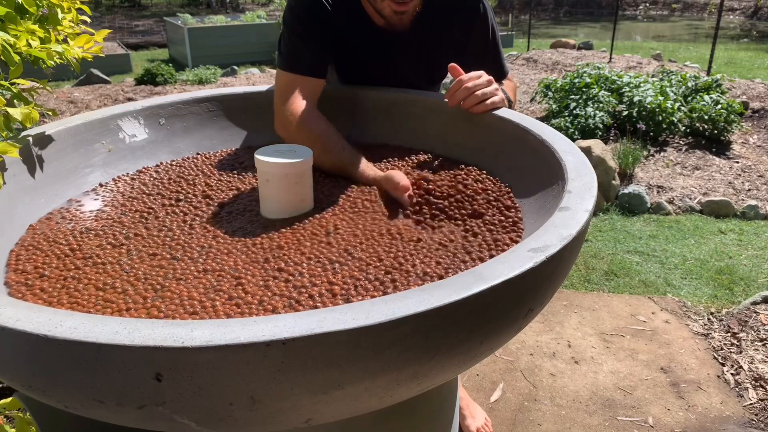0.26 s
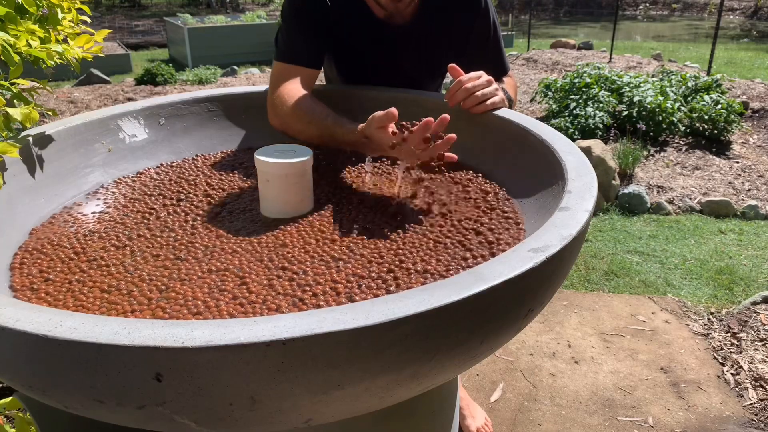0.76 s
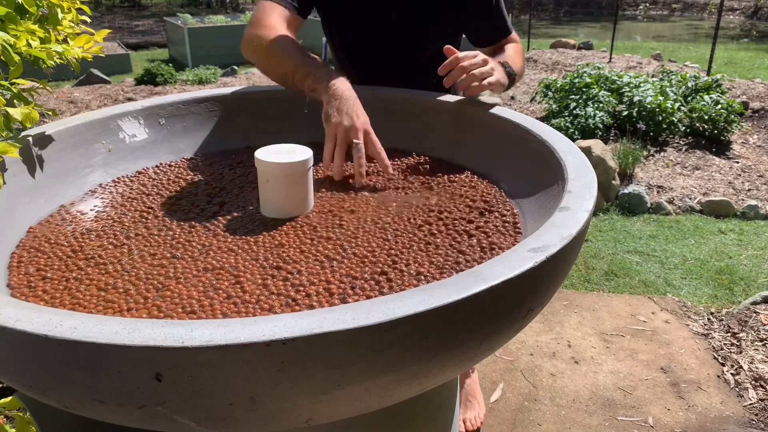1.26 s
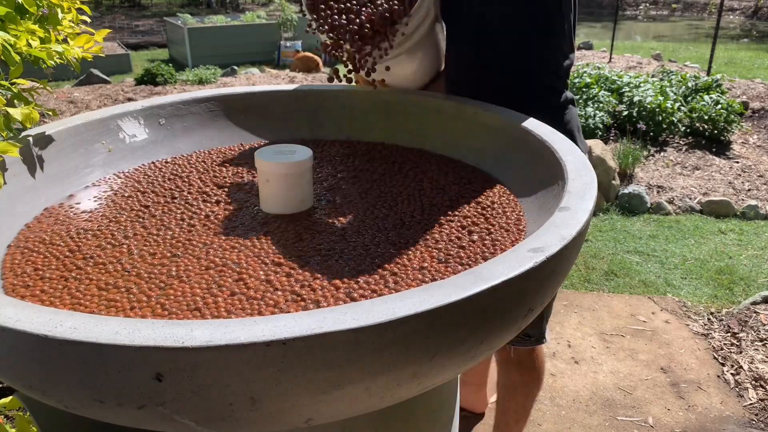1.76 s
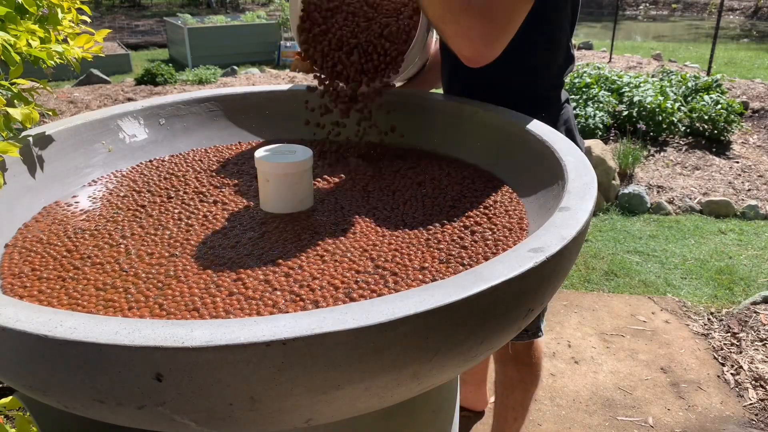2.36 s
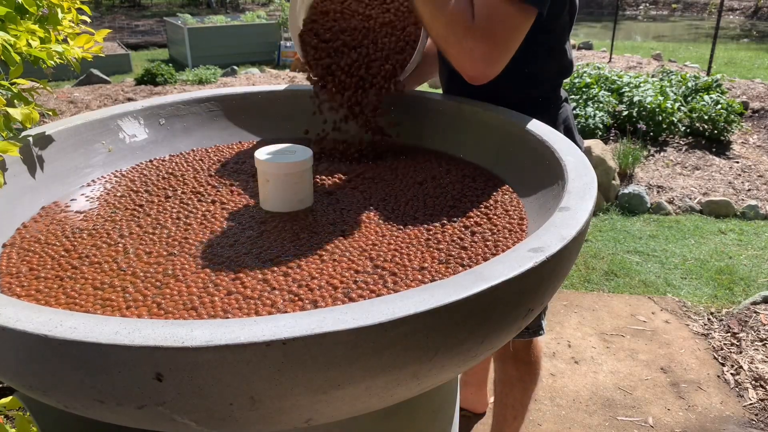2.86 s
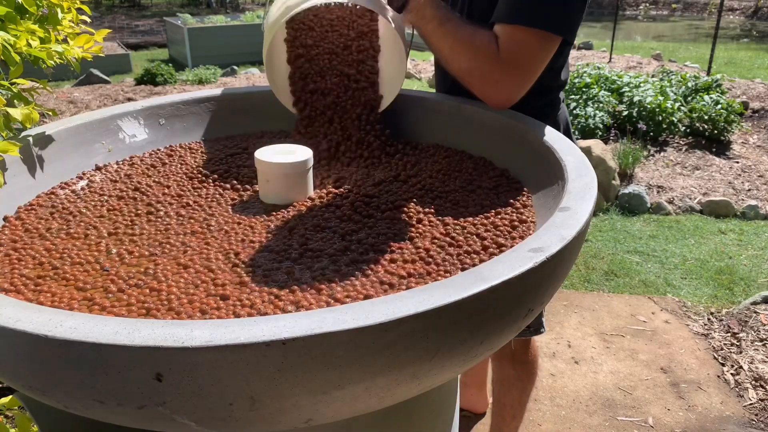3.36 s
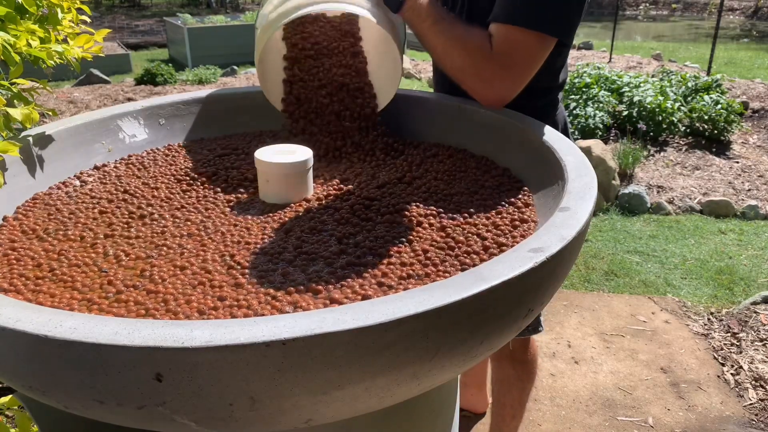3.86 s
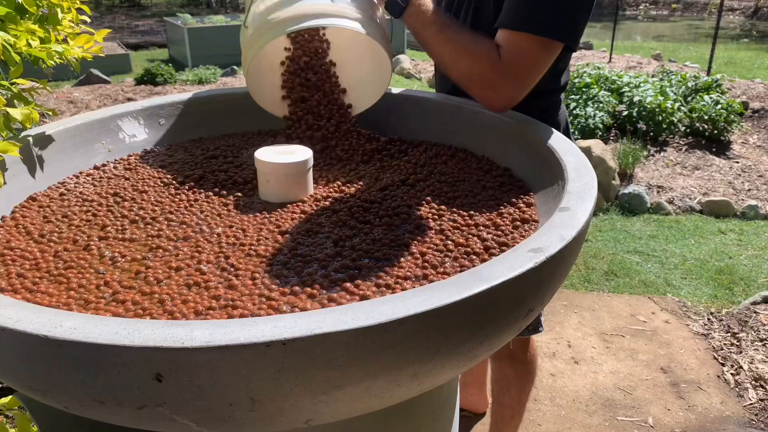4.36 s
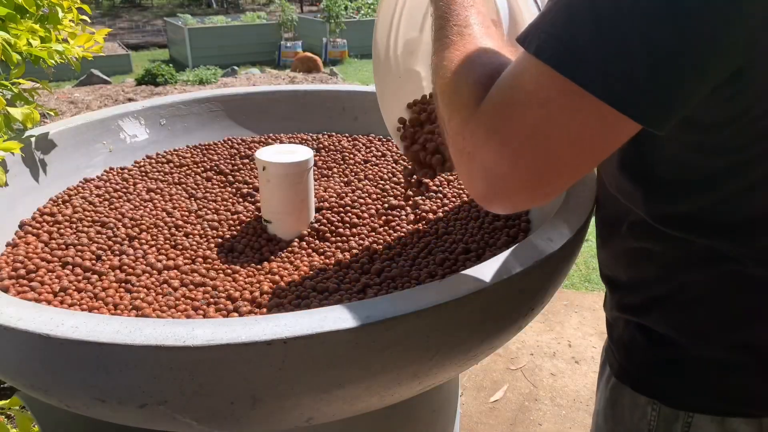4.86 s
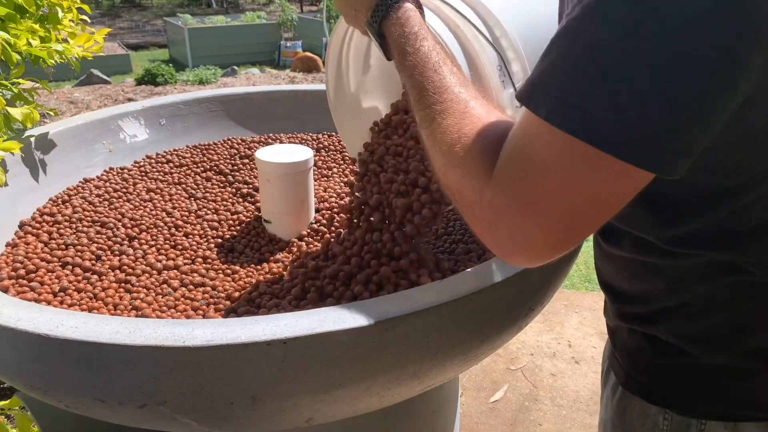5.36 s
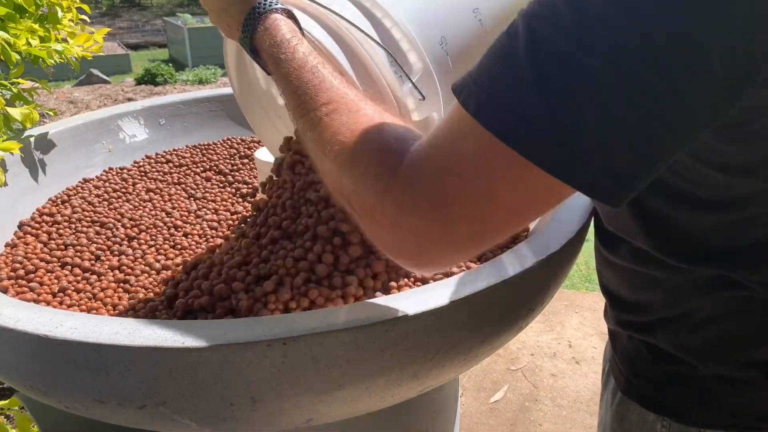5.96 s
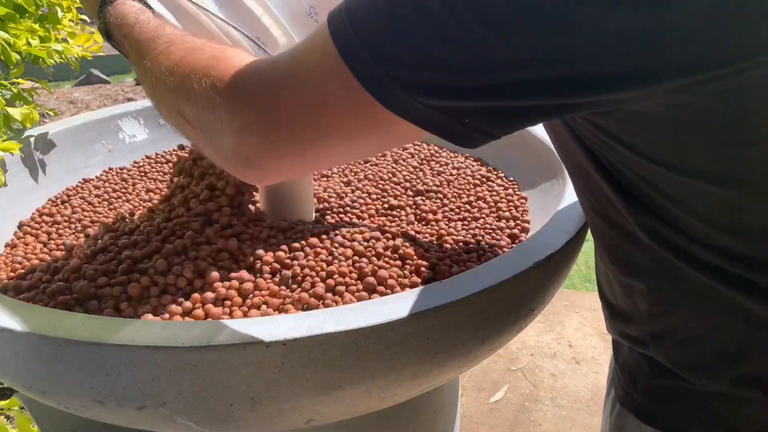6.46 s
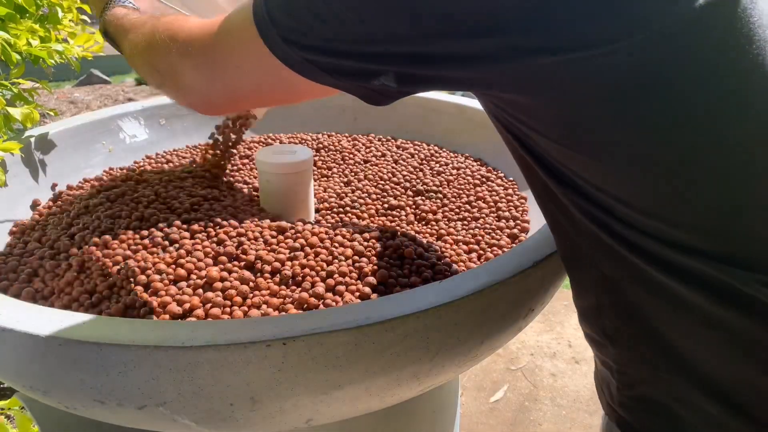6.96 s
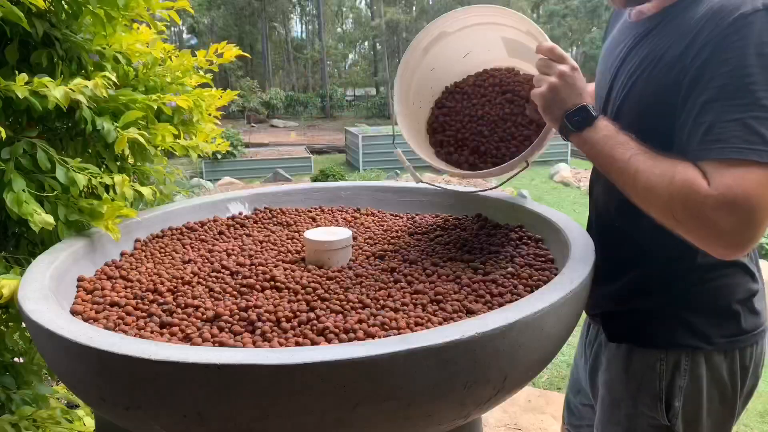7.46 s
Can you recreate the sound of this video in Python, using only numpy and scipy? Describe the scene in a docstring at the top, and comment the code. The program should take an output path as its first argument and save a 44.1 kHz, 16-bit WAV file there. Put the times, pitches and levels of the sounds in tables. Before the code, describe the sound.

A hand stirs wet clay pebbles in a water-filled bowl with trickles and drips, then buckets of pebbles pour in, clattering loudly in several bursts.

```python
"""Pebbles clatter, clack and plop in water: a hand stirs and drops them, then a bucket pours them four times.
Porous clay pebbles, a wide water-filled bowl outdoors; five passages, each fading in and out, some far, some near.
Thousands of short damped contacts make the clatter; single clacks are bursts of contacts in one broad resonance.
Bubbles, trickle and plops are decaying or swelling sines; filtered noise is the open air.
The recorder cuts the bass in steps, squashes the peaks and keeps hardly anything above about 7 kHz."""
import sys
import numpy as np
from scipy import signal
from scipy.fft import rfft, irfft, next_fast_len
from scipy.io import wavfile
from scipy.ndimage import uniform_filter1d, map_coordinates

SR = 44100
rng = np.random.default_rng(int(sys.argv[2]) if len(sys.argv) > 2 else 0)


def natural_amplitude(level_db):
    """Convert a level in decibels to a linear amplitude factor, elementwise."""
    exponent = np.asarray(level_db, float) / 20
    return 10 ** exponent


def materialize(psi):
    """Save the field psi as 16-bit PCM at rate SR to the path in sys.argv[1].

    A 1-D psi becomes a single channel; in a 2-D psi each row is a channel.
    """
    bounded = np.clip(np.atleast_2d(psi).T, -1, 1)
    quanta = np.round(bounded * 32767).astype(np.int16)
    wavfile.write(sys.argv[1], SR, quanta)


N = 340452  # samples
SPLIT_HZ, TOP_HZ = 4050, 7250  # between dull body and hard ticks; upper limit of the sound


def unit(x):
    """Scale to rms 1."""
    return x / np.sqrt(np.mean(x ** 2) + 1e-20)


def along(points, hz):
    """Interpolate (pitch_hz, value) points on a log frequency axis."""
    f, v = np.transpose(points)
    return np.interp(np.log(hz + 1), np.log(f + 1), v)


def wobble(rate):
    """A smooth random curve with rate knots a second."""
    knots = rng.standard_normal(int(N * rate / SR) + 4)
    return map_coordinates(knots, [np.arange(N) * rate / SR])


def filtered(x, response):
    """Filter x by a response given as a function of frequency."""
    m = next_fast_len(len(x) + 8192)
    return irfft(rfft(x, m) * response(np.fft.rfftfreq(m, 1 / SR)), m)[:len(x)]


def resonance(f, centre_hz, width_hz):
    """Response of one damped mode, 1 at its centre."""
    damping = 1j * f * width_hz
    return damping / (centre_hz * centre_hz - f * f + damping)


def roughness(n, size):
    """Slow random unevenness of rms 1."""
    return unit(uniform_filter1d(rng.standard_normal(n), size=size))


def contacts(n, rate, spread_db, cycles):
    """Random pebble contacts: each a click and a damped ring of a few cycles, evened to a flat spectrum."""
    draw = rng.random((int(rate * n / SR), 3))
    hz = 300 * 25 ** draw[:, 1:2]
    sign = np.sign(draw[:, 2:] - .5)
    size = sign * natural_amplitude(2 * spread_db * np.tanh(rng.standard_normal((len(draw), 1)) / 2))
    t = np.arange(400) / SR
    ring = np.sin(2 * np.pi * hz * t) * np.exp(-t * hz / cycles) * hz / 3000
    ring[:, 0] += 1.5  # the click
    at = (draw[:, :1] * n).astype(int) + np.arange(len(t))
    z = rfft(np.bincount(at.ravel(), (size * ring).ravel())[:n])
    smooth_power = uniform_filter1d(abs(z) ** 2, size=n // 100)
    return unit(irfft(z / np.sqrt(smooth_power + 1e-9), n))


# changes from one passage to the next: time_s, fade_out_s, fade_in_s
CUTS = [(1.492, 0.21, 0.22), (3.01, 0.11, 0.13), (4.355, 0.12, 0.15), (7.33, 0.16, 0.17)]


def swells(rows):
    """Each flow of pebbles rises, holds while drifting, then dies; none outlasts its passage."""
    rise_curve, release_db_per_s = 1.75, 145
    t, power = np.arange(N) / SR, np.zeros(N)
    ends = np.array([c[0] for c in CUTS] + [N / SR])
    for start, rise, hold, db, drift in rows:
        age = t - start - rise
        level_db = db + drift * np.clip(age, 0, hold) - release_db_per_s * np.clip(age - hold, 0, None)
        alive = t < ends[np.searchsorted(ends, start + rise)]
        onset = np.clip((t - start) / rise, 0, 1) ** rise_curve
        power += (natural_amplitude(level_db) * onset * alive) ** 2
    return np.sqrt(power)


# colour of the distant outdoor hiss: pitch_hz, relative level_db
GARDEN = [(150, -18.5), (773, -7), (7000, -4)]


def garden():
    """A faint steady hiss of the open air: filtered noise."""
    noise = rng.standard_normal(N)
    return natural_amplitude(-57.0) * unit(filtered(noise, lambda hz: natural_amplitude(along(GARDEN, hz)) * (hz < TOP_HZ)))


# bubbles and drips in the bowl: start_s, level_db, pitch_hz, t60_s
BUBBLES = [(.058, -20.5, 3200, 0.031), (.34, -23.5, 716, 0.032), (.785, -28, 885, 0.015),
           (1.004, -27.5, 763, 0.054), (1.025, -34, 1486, 0.082), (1.174, -34.5, 797, 0.095),
           (1.243, -42, 1240, 0.079), (1.246, -40, 1975, 0.098), (1.262, -36, 1440, 0.03),
           (.94, -40, 1240, 0.076)]


def bubbles():
    """A trapped bubble starts softly and rises in pitch as it nears the surface, its level wavering."""
    out, t = np.zeros(N), np.arange(SR // 6) / SR
    for start, db, hz, t60 in BUBBLES:
        tone = np.sin(2 * np.pi * hz * (t + 0.13 * t * t / t60))
        tone *= 1 + 0.53 * roughness(len(t), size=90)
        envelope = natural_amplitude(db - 60 * t / t60) * (1 - np.exp(-t / 0.0031))
        out[round(start * SR):][:len(t)] += envelope * tone
    return out


def bubbling(count, pitch_hz, spread, cycles):
    """Small bubbles scattered around a moving pitch while the hand is in the water; rms 1 where they sound."""
    at = rng.uniform(0.2, 1.27, size=(count, 1))
    scatter, size = rng.standard_normal((2, count, 1))
    hz, t = pitch_hz(at) * np.exp(spread * scatter), np.arange(900) / SR
    envelope = np.exp(-t * hz / cycles) * (1 - np.exp(-t / 0.00085))
    ring = natural_amplitude(4.9 * size) * np.sin(2 * np.pi * hz * t) * envelope
    index = (at * SR).astype(int) + np.arange(len(t))
    x = np.bincount(index.ravel(), ring.ravel(), minlength=N)
    return x / np.sqrt(np.mean(x[x != 0] ** 2))


# gushes of water running off the hand: peak time_s, bubble pitch_hz, top level_db
GUSHES = [(.28, 2460, -45), (0.451, 2820, -21), (.68, 2480, -32.5), (.76, 2580, -39), (.83, 3100, -36),
          (.9, 2500, -40), (.97, 2440, -38.5), (1.028, 2800, -29.5), (1.1, 2530, -34)]


def trickle():
    """Many small bubbles of nearly one size, drifting in pitch from gush to gush, and some larger ones."""
    slope_db_per_s = 261  # how fast a gush swells and thins
    s, pitch_hz, db = np.transpose(GUSHES)
    distance_s = abs(np.arange(N)[:, None] / SR - s)
    flow = np.linalg.norm(natural_amplitude(db - slope_db_per_s * distance_s), axis=1)
    fine = bubbling(count=1600, pitch_hz=lambda at: np.interp(at, s, pitch_hz), spread=.07, cycles=7.6)
    large = bubbling(count=160, pitch_hz=lambda at: 1135, spread=0.363, cycles=4.5)
    return flow * (fine + natural_amplitude(-23.5) * large)


# single pebbles plunging: centre time_s, level_db, pitch_hz
PLOPS = [(3.366, -20.5, 1440), (3.38, -15, 1530), (3.3945, -17.5, 1390), (3.488, -17.5, 1460),
         (3.502, -16, 1870), (3.546, -25.5, 870), (3.55, -18.5, 1520), (3.554, -19, 2600),
         (3.563, -19, 1660), (3.597, -17.5, 1520), (3.657, -19.5, 1460), (3.676, -17.5, 1510),
         (3.868, -18, 2230), (3.965, -16, 2390), (4.184, -19.5, 2720)]


def plops():
    """The pocket of air behind a sinking pebble swells and closes within a few cycles: a short round plop."""
    cycles = 5.8  # from the middle to the fading edge
    out, t = np.zeros(N), np.arange(-SR // 50, SR // 50) / SR
    for s, db, hz in PLOPS:
        rough = 1 + 0.48 * roughness(len(t), size=40)
        envelope = natural_amplitude(db) * np.exp(-(t * hz / cycles) ** 2)
        out[round((s + t[0]) * SR):][:len(t)] += envelope * rough * np.sin(2 * np.pi * hz * t)
    return out


# the half-empty bucket is tipped further: start_s, rise_s, hold_s, top level_db, drift_db_per_s
HOLLOW = [(5.85, 0.39, 0.28, -22, -8.5)]
# the bucket's hollow ring: pitch_hz, width_hz, relative level_db
BUCKET = [(1003, 110, 4)]


def bucket():
    """Pebbles rattling along the plastic wall set its hollow ringing: contacts through the wall mode twice."""
    ring = lambda f: sum(natural_amplitude(db) * resonance(f, hz, width) for hz, width, db in BUCKET)
    rattle = contacts(N, 2800, spread_db=4.5, cycles=3.5)
    return swells(HOLLOW) * unit(filtered(filtered(rattle, ring), ring))


# single clacks and small clusters landing: start_s, level_db, pitch_hz, length_s
CLACKS = [(0.449, -23.5, 3030, 0.002), (0.487, -21.5, 2980, 0.003), (0.81, -34.5, 3240, 0.015),
          (0.844, -31.5, 3000, 0.017), (0.905, -34, 2740, 0.041), (0.96, -30.5, 2420, 0.0074),
          (1.004, -28, 2680, 0.011), (1.025, -24.5, 3100, 0.0085), (1.11, -32, 3040, 0.017),
          (1.158, -33, 2830, 0.028), (1.174, -33, 2660, 0.009), (1.265, -39, 5750, 0.011),
          (1.615, -8.5, 2070, 0.0015), (1.638, -11, 1480, 0.014), (1.66, -0.5, 1470, 0.0017),
          (1.918, -23, 6400, 0.03), (3.893, -17.5, 1520, 0.065), (3.916, -28, 2870, 0.012),
          (3.969, -18, 1670, 0.041), (4.024, -21.5, 1650, 0.03), (4.083, -18.5, 1520, 0.014),
          (4.162, -22, 1500, 0.049), (4.501, -12.5, 2060, 0.0041), (4.583, -12, 1300, 0.003),
          (4.606, -13.5, 1450, 0.008), (4.767, -5.5, 2560, 0.0013), (4.842, -8.5, 2600, 0.0012),
          (4.861, -8.5, 2300, 0.0029), (7.145, -16, 2600, 0.0038), (7.193, -16, 3000, 0.0024),
          (7.215, -20, 2720, 0.0017), (7.437, -9, 1360, 0.0023)]
# bright share of a clack, one value per passage [ratio]
FIZZ = [0.71, 0.096, 0.012, 0.19, .1]


def clacks():
    """Each cluster is a burst of contacts in one broad pebble resonance, with a bright fizz set by passage."""
    out, t = np.zeros(N + SR), np.arange(SR // 8) / SR
    mode = lambda f, hz, width: resonance(f, hz, width) ** 2
    for start, db, hz, length in CLACKS:
        decay = natural_amplitude(-60 * np.clip(t - length, 0, 1) / (0.031 + 0.6 * length))
        shape = (1 - np.exp(-t / 0.00031)) * decay
        burst = shape * contacts(len(t), 5000, spread_db=3.0, cycles=5.7)
        burst[10] += 35 * np.exp(-length / .006)  # a lone pebble clicks, a cluster sets in softly
        fizz = FIZZ[np.searchsorted([c[0] for c in CUTS], start)]
        ring = filtered(burst, lambda f: mode(f, hz, 0.29 * hz) - 0.14 * mode(f, 1.6 * hz, 0.58 * hz)
                        + fizz * mode(f, 5900, 1500))
        ring *= np.linalg.norm(shape) / np.linalg.norm(ring)
        out[round(start * SR):][:len(t)] += natural_amplitude(db) * ring
    return out[:N]


# colour of the clatter in each stage: pitch_hz, relative level_db
WET = [(150, -35.5), (413, -23.5), (750, -11.5), (1500, -15), (2940, 0.5), (4180, -9.5), (6160, -3),
       (7000, -13.5)]
SPLASHING = [(150, -26.5), (432, -15.5), (620, -6.5), (790, -7), (882, -12.5), (1100, -2.5), (2500, -3.5),
             (4180, -5.5), (6020, 6), (7100, -0.5)]
FAR = [(200, -31), (850, -1.5), (1140, -6.5), (1500, 1.5), (2950, -6.5), (3670, -15), (6240, -6.5),
       (7100, -17)]
NEAR = [(170, -27.5), (205, -10.5), (239, -15.5), (546, -6.5), (971, -2), (2280, 1.5), (4120, -7),
        (5810, 1.5), (7000, -4.5)]
HEAPED = [(200, -24.5), (880, -10), (966, -2.5), (2700, 0), (4660, -11.5), (6200, -5), (7100, -16)]
EMPTYING = [(200, -24), (880, -13), (960, -1), (1100, -10.5), (2000, 0), (2900, -1.5), (4660, -8.5),
            (6200, -4.5), (7100, -10.5)]
LAST = [(170, -24), (538, -16), (1370, -6), (2360, -6), (4820, -13), (5810, -5.5), (7000, -14)]
# stages of the pour: start_s, colour, contacts_per_s, size_spread_db, smooth rush share (0-1), ring_cycles
STAGES = [(0, WET, 2000, 6, 0.44, 11), (1.495, SPLASHING, 2600, 3, 0.57, 10),
          (3.016, FAR, 2200, 8, 0.88, 5), (4.356, NEAR, 1300, 5.5, 0.63, 3.6),
          (5.58, HEAPED, 3700, 3.5, 0.83, 5.5), (6.35, EMPTYING, 2600, 3, 0.73, 6.6),
          (7.13, EMPTYING, 530, 3.5, 0.48, 3.2), (7.326, LAST, 2250, 8, 0.57, 6.5)]
# pebbles sliding and rolling, the dull body, hand first, then the pours:
# start_s, rise_s, hold_s, top level_db, drift_db_per_s
SLIDES = [(.22, 0.2, 0.13, -30, -2), (.5, 0.042, 0.71, -47.5, -17), (1.49, 0.17, 0.29, -13.5, -48),
          (1.85, 0.14, 0.599, -27, 14), (2.56, 0.047, 0.98, -22, 4), (3.0, 0.02, 0.51, -36.5, 15.5),
          (3.46, 0.092, 0.2, -28.5, -13), (3.74, 0.12, 0.73, -26, -10), (4.34, 0.04, 0.435, -15, -0.5),
          (4.835, 0.026, 2.01, -13, -0.43), (6.88, 0.085, 0.24, -14, -45.5),
          (7.31, 0.049, 0.31, -13.5, 4.5)]
# pebbles landing on pebbles and water, the hard ticks: start_s, rise_s, hold_s, top level_db, drift_db_per_s
LANDINGS = [(.3, 0.055, 0.15, -25, -45.5), (.6, 0.2, 0.36, -43, -8), (1.59, 0.034, 0.37, -21.5, -38.5),
            (1.88, 0.065, 0.43, -22.5, -18.5), (2.3, 0.092, 1.7, -26.5, 4), (3.0, 0.016, 1.35, -45.5, -1.5),
            (4.34, 0.026, 0.56, -30.5, -10.5), (4.83, 0.31, .55, -22.5, -5.5), (5.6, 0.18, 1.2, -24, 2.5),
            (6.92, 0.077, 0.23, -21, -29), (7.31, 0.053, .4, -26, -12.5)]


def clatter():
    """The stream of pebbles: dull body below the split, hard ticks above it, both surging, the sparser in clumps."""
    sliding, landing = swells(SLIDES), swells(LANDINGS)
    clumps_db = 3 * wobble(110)
    high = lambda hz: 1 / (1 + (SPLIT_HZ / (hz + 1)) ** 8)
    out = np.zeros(N)
    ends = [row[0] for row in STAGES[1:]] + [N / SR]
    for (start, colour, rate, spread_db, smooth, cycles), end in zip(STAGES, ends):
        a, b = round(start * SR), round(end * SR)
        grains = contacts(b - a, rate, spread_db, cycles)
        rush = rng.standard_normal(b - a)
        drive = np.sqrt(1 - smooth) * grains + np.sqrt(smooth) * rush
        body = unit(filtered(drive, lambda hz: natural_amplitude(along(colour, hz)) * (1 - high(hz))))
        ticks = unit(filtered(drive, lambda hz: natural_amplitude(along(colour, hz)) * high(hz) * (hz < TOP_HZ)))
        flow = sliding[a:b] * body + landing[a:b] * ticks
        out[a:b] = natural_amplitude((1 - smooth) * clumps_db[a:b]) * flow
    return out


# the band favoured by the air between near bucket and heap, moving as the bucket tips: time_s, pitch_hz
MOUTH = [(4.4, 2000), (5.5, 2200), (5.85, 2700), (6.2, 1400), (6.42, 2000), (7.2, 2400)]


def mouth(x):
    """A moving resonance of the air lifts one band of the near pour."""
    lift_db, width_hz = 2, 233
    hz, t, z = signal.stft(x, SR)
    s, centre_hz = np.transpose(MOUTH)
    band = np.exp(-((hz[:, None] - np.interp(t, s, centre_hz)) / width_hz) ** 2)
    near = (t > s[0]) * (t < CUTS[-1][0])
    return signal.istft(z * natural_amplitude(lift_db * band * near), SR)[1][:N]


def scene():
    """All sounds of the bowl, in the open air, at one microphone."""
    pour = mouth(clatter()) + bucket()
    water = trickle() + plops() + bubbles()
    return (pour + water + clacks() + garden())[None]


def fades():
    """The level dips to silence at each change of passage."""
    s, out_s, in_s = np.transpose(CUTS)
    since = np.arange(N)[:, None] / SR - s
    ramp = np.clip(abs(since) / np.where(since < 0, out_s, in_s), 0, 1)
    return (ramp * (abs(since) > .009)).min(axis=1) ** 1.4


# the recorder's bass cut: start_s, cut_hz
LOW_CUT = [(0, 150), (1.495, 168), (3.016, 802), (4.356, 175), (5.23, 414), (5.58, 790), (7.326, 170)]


def low_cut(x):
    """A steep cut holds the bass down, its edge moving in steps."""
    hz, t, z = signal.stft(x, SR, nperseg=2048)
    starts, cut_hz = np.transpose(LOW_CUT)
    below = hz[:, None] < cut_hz[np.searchsorted(starts, t, side="right") - 1]
    return signal.istft(z * np.where(below, natural_amplitude(-22.5), 1), SR, nperseg=2048)[1][:N]


def low_pass(x):
    """Removes everything above the highest recorded frequency."""
    return signal.sosfilt(signal.butter(12, 8070, fs=SR, output="sos"), x)


def record(dry):
    """Soft clipping, stepped bass cut, a faint noise that follows the level, a band limit, fades, a ceiling."""
    squashed = dry[0] / (1 + abs(dry[0] / 0.8) ** 4) ** .25
    x = low_cut(squashed)
    x = x + natural_amplitude(-23.0) * uniform_filter1d(abs(x), size=130) * rng.standard_normal(N)
    band_limit = [(6900, 0), (TOP_HZ, -7), (7400, -38), (7900, -78)]  # pitch_hz, gain in dB
    x = filtered(x, lambda f: natural_amplitude(along(band_limit, f)))
    mix = np.clip(x * fades(), -.92, .92)[None]
    return low_pass(mix)


dry = scene()
out = record(dry)
materialize(out)
```